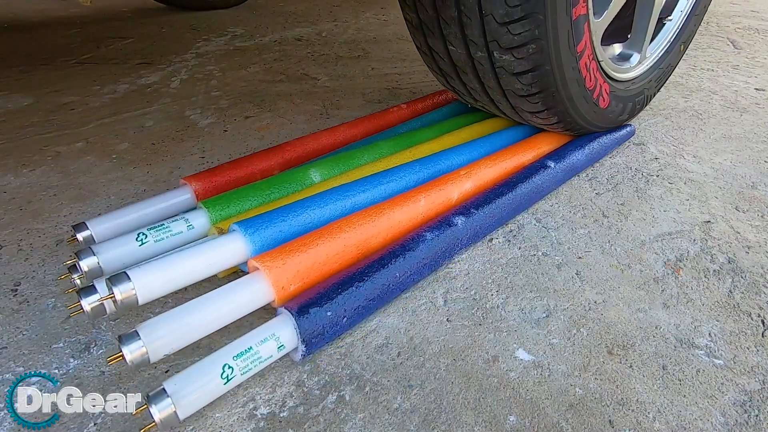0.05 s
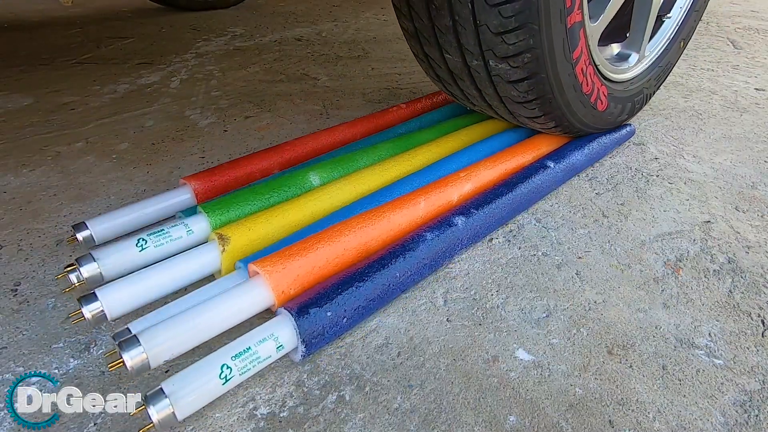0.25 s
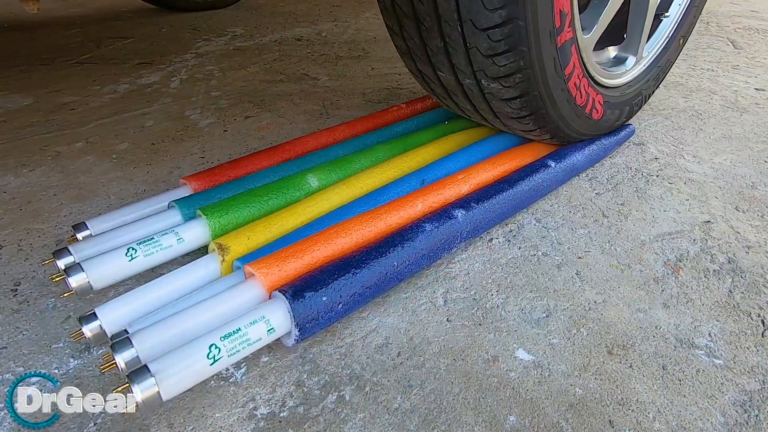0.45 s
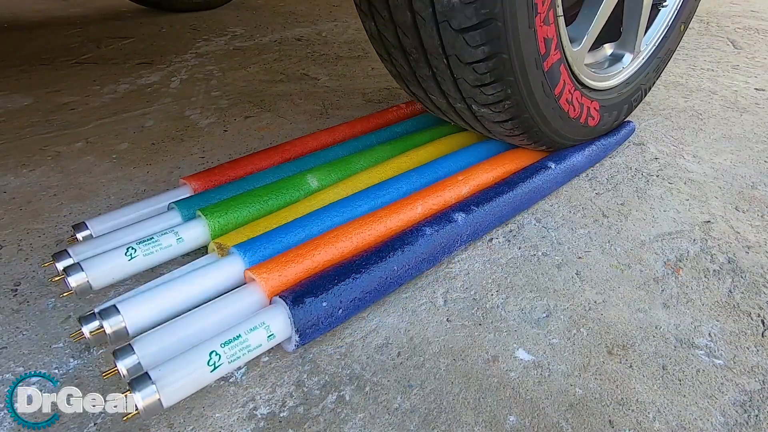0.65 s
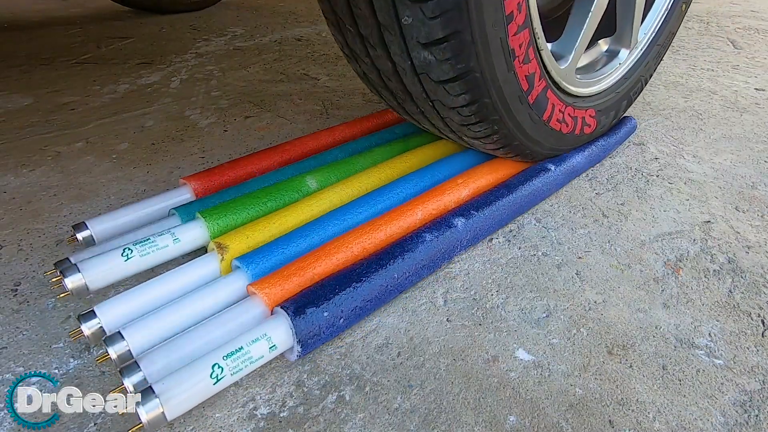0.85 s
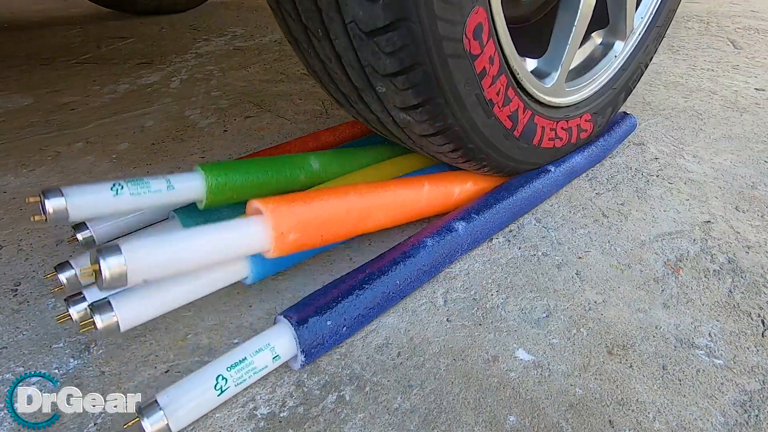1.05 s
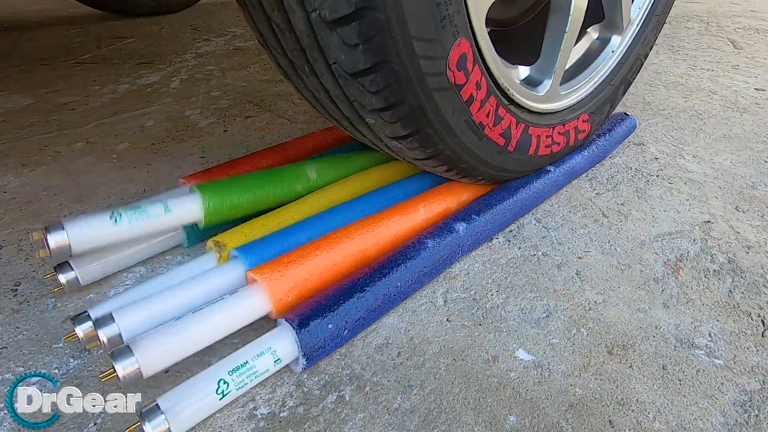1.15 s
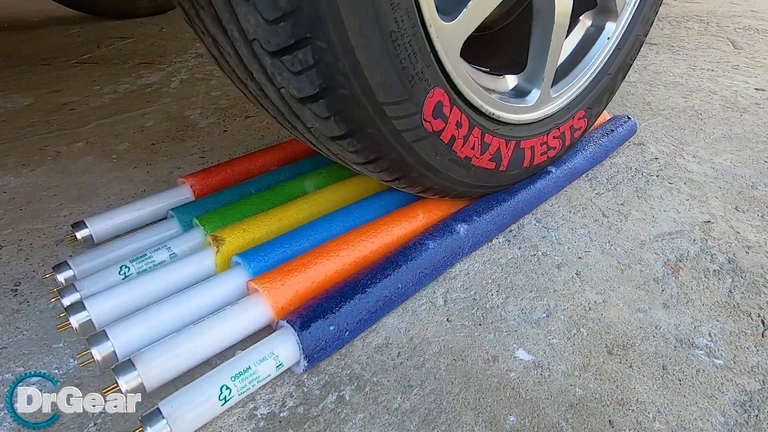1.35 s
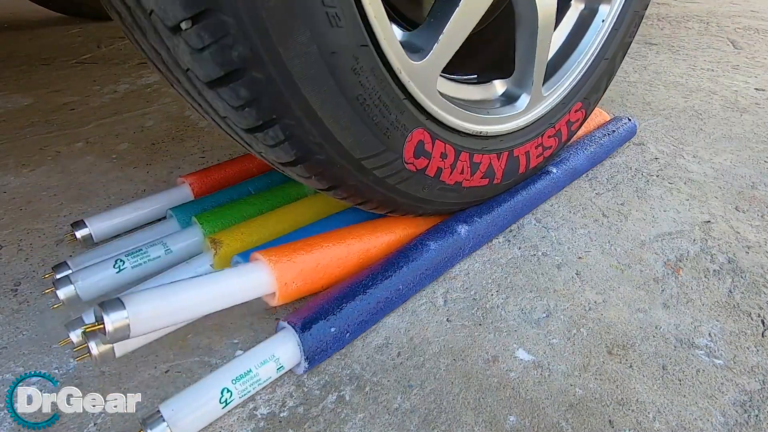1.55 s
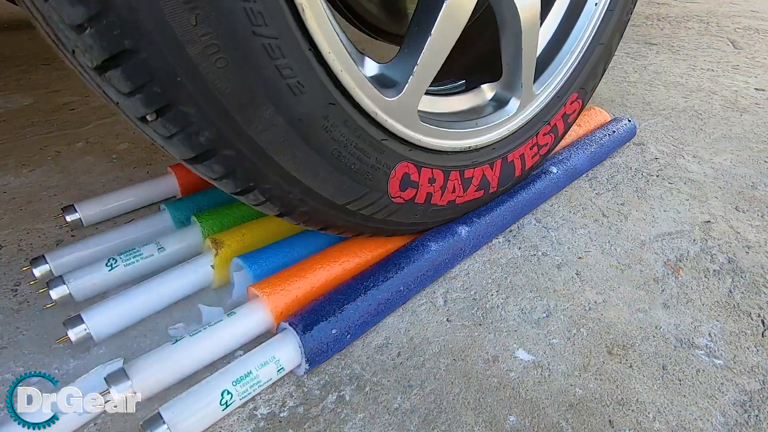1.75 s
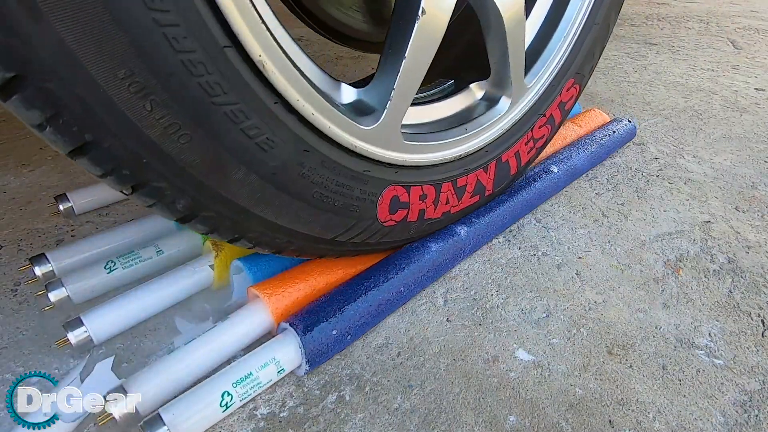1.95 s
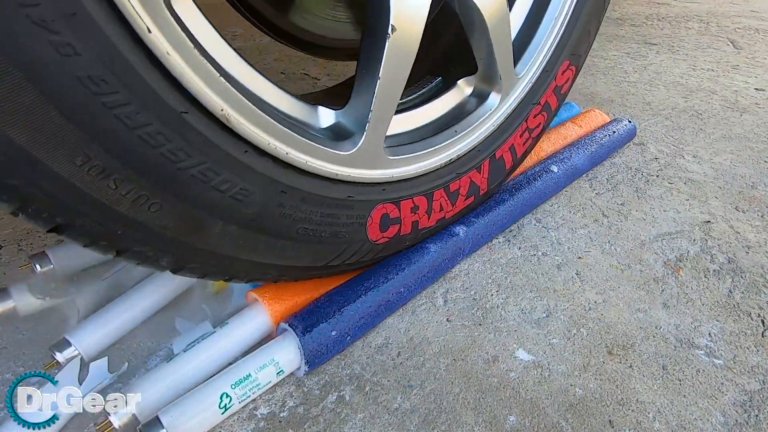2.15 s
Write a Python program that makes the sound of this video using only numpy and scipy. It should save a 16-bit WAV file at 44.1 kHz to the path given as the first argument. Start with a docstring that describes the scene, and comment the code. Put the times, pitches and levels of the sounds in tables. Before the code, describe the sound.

Glass tubes crushed by a car tyre on concrete: sharp hollow pops early, a brief near-quiet, then dense bright cracking and crunching, one more huge pop, and sparse cracks. Close microphone, nearly mono, overloading on the pops.

```python
"""On concrete, close to the microphone, a car tyre creeps over glass tubes in foam sleeves.
Whole tubes implode: each pop is a falling sweep, a hollow ring, a noisy rush and a swing of pressure.
Cracks are decaying bursts of clicks with ringing shards, dull knocks and a low push.
Random grains of glass crunch under the tread, and behind them an engine hums in sines over rumbling noise,
with a flickering airy hiss. The loudest pops overload the input."""
import sys
import numpy as np
from scipy import signal
from scipy.fft import rfft, irfft, next_fast_len
from scipy.io import wavfile

SR = 44100
rng = np.random.default_rng(int(sys.argv[2]) if len(sys.argv) > 2 else 0)


def bounce(signal):
    """Save signal as a 16-bit WAV file at the path given by the first command-line argument."""
    frames = np.transpose(np.atleast_2d(signal))
    limited = np.clip(frames, -1, 1)
    pcm = np.round(limited * 32767).astype(np.int16)
    wavfile.write(sys.argv[1], SR, pcm)


def convert_level_to_amplitude(level_db):
    """Map a level in decibels to its linear amplitude factor."""
    exponent = np.asarray(level_db, float) / 20
    return 10 ** exponent


N = 97020   # length [samples]


def rms_one(x):
    """Scale to rms 1."""
    return x / np.sqrt(np.mean(x ** 2) + 1e-20)


def in_time(rows):
    """Draw the columns of a timed table as curves with a value at every sample."""
    s, *columns = np.transpose(rows)
    return [np.interp(np.arange(N) / SR, s, c) for c in columns]


def filtered(x, order, hz, kind):
    """Butterworth filter: keep what lies below, above or between the given frequencies."""
    return signal.sosfilt(signal.butter(order, hz, kind, fs=SR, output="sos"), x)


def noise_around(hiss, hz):
    """Noise from an octave below to an octave above a pitch, at rms 1."""
    return rms_one(filtered(hiss, 2, [hz * .5, hz * 2], "band"))


def colour(x, points):
    """Minimum-phase filter with the given spectrum, so nothing sounds early."""
    size = next_fast_len(N + 4096)
    hz, db = np.transpose(points)
    f = np.arange(size // 2 + 1) * SR / size + 1   # 1 Hz up, so that the logarithm exists
    spectrum_db = np.maximum(np.interp(np.log(f), np.log(hz), db), -70)
    cepstrum = irfft(spectrum_db * np.log(10) / 20, size)
    # folding the second half onto the first gives minimum phase
    cepstrum[1:size // 2] *= 2
    cepstrum[size // 2 + 1:] = 0
    return irfft(rfft(x, size) * np.exp(rfft(cepstrum)), size)[:N]


def drift(rate):
    """Chance wandering of rms 1: noise smoothed above a rate in Hz."""
    r = np.exp(-2 * np.pi * rate / SR)
    noise = rng.standard_normal(N + SR)
    return rms_one(signal.lfilter([1], [1, -2 * r, r * r], noise)[SR:])


def dying(s, db, t60):
    """Envelope that jumps at each time and falls by 60 dB in t60 seconds."""
    clicks = np.zeros(N)
    np.add.at(clicks, (np.asarray(s) * SR).astype(int), convert_level_to_amplitude(db))
    return signal.lfilter([1], [1, -convert_level_to_amplitude(-60 / (t60 * SR))], clicks + 1e-18)


def ring(clicks, hz, t60):
    """Resonance: a unit click starts a dying sine of height 1."""
    r, w = convert_level_to_amplitude(-60 / (t60 * SR)), 2 * np.pi * hz / SR
    return signal.lfilter([0, np.sin(w)], [1, -2 * r * np.cos(w), r * r], clicks + 1e-18)


def spikes(spread_db, rate=SR):
    """Random fracture clicks of uneven size, on average rate per second; rms 1."""
    sizes = convert_level_to_amplitude(spread_db * np.minimum(rng.exponential(1, N), 5)) * rng.choice([-1, 1], N)
    return rms_one(sizes * (rng.random(N) < rate / SR))


def burst(s, db, t60, points, tail_t60=0.09, tail_db=-20):
    """Fracture clicks under a quick decay and a weaker, longer tail, then coloured."""
    grit = spikes(2)
    shape = dying(s, db, t60) + convert_level_to_amplitude(tail_db) * dying(s, db, tail_t60)
    return colour(grit * shape, points) / np.std(colour(grit, points))


# when a tube implodes: time [s]
POP_TIMES = [.2123, .3755, .3946, .4168, 1.6906]
# each implosion, one row per time: (sweep level [dB], settled pitch [Hz], sweep t60 [s], hollow level [dB],
# crack level [dB], suction level [dB], suction t60 [s], pressure swing [Hz])
IMPLOSIONS = [(6.5, 607, 0.023, 2, -7.5, 4, 0.11, 1.4), (-1.5, 740, 0.024, -1.5, -8, -0.5, 0.26, 6.2),
              (4, 610, 0.021, -2.5, -11.5, 6, 0.05, 44), (-3, 560, 0.045, -3, -14, -22, 0.033, 4.1),
              (6.5, 880, 0.017, 4, -16, 17, 0.036, 21)]
# hollow ring of the sleeved tubes: (pitch [Hz], relative level [dB], t60 [s])
HOLLOW_MODES = [(229, -21, 0.73), (396, 5.5, 0.027), (595, 14.5, 0.019), (790, -9.5, 0.075),
                (1150, -11, 0.031)]
# colour of broken glass, in the pops and under the tread: (frequency [Hz], relative level per Hz [dB])
GRIT_COLOUR = [(900, -33.5), (1600, -5.5), (2500, 2), (5100, 2), (6800, -3.5), (10600, -2), (14900, -22),
               (16500, -35)]


def pops():
    """A falling sweep, the hollow ring of the tubes and an inrush of air that pulls the pressure down."""
    SWEEP_HZ, FALL_S, SWEEP_RISE_S = 1500, .0008, .0012
    RUSH_DB, RUSH_T60_S, SUCTION_RISE_S = -9.5, 0.079, .005
    out, t = np.zeros(N), np.arange(SR // 2) / SR
    noise = rng.standard_normal((len(IMPLOSIONS), len(t)))
    waver = convert_level_to_amplitude(3 * drift(20))
    for at, row, hiss in zip(POP_TIMES, IMPLOSIONS, noise):
        db, hz, t60, hollow_db, _, suction_db, suction_t60, swing_hz = row
        pitch = hz + SWEEP_HZ * np.exp(-t / FALL_S)
        sweep = np.sin(2 * np.pi * np.cumsum(pitch) / SR) * convert_level_to_amplitude(db - 60 * t / t60)
        sweep = sweep * (1 - np.exp(-t / SWEEP_RISE_S))

        hit = hiss * convert_level_to_amplitude(-60 * t / 0.018)
        hollow = sum(convert_level_to_amplitude(mode_db) * ring(hit, f, d) for f, mode_db, d in HOLLOW_MODES)
        hollow = hollow / np.abs(hollow).max()
        # noisy collapse of the walls
        rush = convert_level_to_amplitude(RUSH_DB - 60 * t / RUSH_T60_S) * noise_around(hiss, hz)

        suction = convert_level_to_amplitude(suction_db - 60 * t / suction_t60) * np.cos(2 * np.pi * swing_hz * t)
        suction = suction * (1 - np.exp(-(t / SUCTION_RISE_S) ** 2))

        i = int(at * SR)
        body = convert_level_to_amplitude(hollow_db) * waver[i:i + len(t)] * (hollow + rush)
        out[i:i + len(t)] += (sweep + body - suction)[:N - i]
    crack_db = np.transpose(IMPLOSIONS)[4]
    return out + burst(POP_TIMES, crack_db, .022, GRIT_COLOUR, tail_t60=0.22, tail_db=-25.5)


# glass cracks, levels relative within each column:
# (time [s], crack level [dB], top treble level [dB], knock level [dB], knock pitch [Hz])
GLASS_CRACKS = [(0.7443, -13.5, -16.5, -27, 858), (0.789, -12, -9, -28.5, 846),
                (0.8928, -13, -16, -24, 535), (0.9283, -23.5, -35, -44, 800), (0.9793, -5, -9, -17.5, 765),
                (0.9876, -13, -13, -38, 1660), (1.026, -27, -42, -28, 840),
                (1.0591, -4.5, -10.5, -18, 1074), (1.069, -18, -21.5, -19, 807),
                (1.0966, -24.5, -34.5, -17.5, 750), (1.1079, -6.5, -5.5, -11.5, 1164),
                (1.1161, -23, -19, -9, 1350), (1.1242, -4.5, -4, -21, 486), (1.1347, -5.5, -13, -12.5, 690),
                (1.2188, -9.5, -10, -29.5, 1150), (1.2306, -21, -15.5, -14.5, 894),
                (1.257, -16, -25, -10.5, 1445), (1.2664, -15.5, -26, -10.5, 940),
                (1.275, -13, -14, -16.5, 1010), (1.2862, -21, -14, -11.5, 990),
                (1.2947, -51, -12.5, -21, 830), (1.308, -6.5, -14, -39, 1730),
                (1.331, -23, -21.5, -9.5, 1340), (1.3345, -7, -8.5, -11.5, 1450),
                (1.3926, -19, -48, -13.5, 607), (1.4477, -12, -21, -18.5, 1320),
                (1.4642, -33.5, -22.5, -11.5, 580), (1.4682, -15, -24, -26.5, 1400),
                (1.4874, -10, -14, -5, 1030), (1.5263, -17.5, -14.5, -47, 1480),
                (1.5275, -15.5, -41, -18, 1620), (1.5397, -7, -6.5, -5, 1070), (1.5759, -23, -9, -23, 900),
                (1.5922, -7, -4.5, -15, 660), (1.5997, -32, -14, -26.5, 630), (1.6097, -16, -9, -20.5, 890),
                (1.6264, -11.5, -11, -15, 757), (1.6443, -33.5, -18, -12, 920), (1.659, -12, -16, -16, 870),
                (1.6675, -25, -20.5, -17.5, 920), (1.824, -23.5, -25.5, -40, 770),
                (1.8451, -27, -26.5, -22, 886), (1.8588, -19, -19, -16, 1220), (1.9709, -17, -26, -21, 920),
                (1.98, -24.5, -25, -12.5, 1096), (2.0746, -12, -21, -16.5, 1490),
                (2.0885, -24, -42, -24, 950), (2.0962, -17.5, -20.5, -13, 740),
                (2.1469, -14.5, -18.5, -9, 1020), (2.1924, -15.5, -16.5, -13.5, 760)]
# main part of a crack: (frequency [Hz], relative level per Hz [dB])
MAIN_COLOUR = [(880, -22.5), (1500, 10), (2060, 8), (2400, 7), (5690, 13), (6550, 0), (7500, 5), (9750, 3),
               (16500, -120)]
# top treble of a crack: (frequency [Hz], relative level per Hz [dB])
TREBLE_COLOUR = [(3820, -25.5), (6500, 11.5), (10400, 14.5), (15100, -3), (16000, -9.5), (16500, -28)]


def cracks():
    """Breaking glass: a bright burst of clicks and a second one in the top treble."""
    s, crack_db, top_db, *_ = np.transpose(GLASS_CRACKS)
    main = burst(s, crack_db, .022, MAIN_COLOUR)
    top = burst(s, top_db, .018, TREBLE_COLOUR)
    return convert_level_to_amplitude(-5.5) * main + convert_level_to_amplitude(-7) * top


# ringing of middle-sized shards: (pitch [Hz], relative level [dB])
SHARD_MODES = [(2471, -12), (2955, -12.5), (3914, -18.5), (4447, -12.5), (5706, -14), (7106, -22)]


def rattling_shards():
    """Each crack shakes a large, middle or small shard, whose resonances ring to random clicks."""
    LEVEL_DB, SPREAD_DB, RATTLE_T60_S, RING_T60_S = -25, 4, .05, .04
    PITCH_STEP = .07   # share by which large shards sound lower and small ones higher
    s, crack_db, *_ = np.transpose(GLASS_CRACKS)
    chance = rng.standard_normal((len(s), len(SHARD_MODES)))   # strength of each mode in each crack
    size = rng.integers(-1, 2, len(s))
    out = np.zeros(N)
    for (hz, db), own in zip(SHARD_MODES, chance.T):
        grit = spikes(2)
        level_db = crack_db + LEVEL_DB + db + SPREAD_DB * own
        for k in (-1, 0, 1):
            shake = dying(s[size == k], level_db[size == k], RATTLE_T60_S)
            out += ring(grit * shake, hz * (1 + PITCH_STEP * k), RING_T60_S)
    return out


# a single shard sings out: (time [s], level [dB], pitch [Hz], t60 [s])
SINGING_SHARDS = [(0.893, -21.5, 4447, 0.081), (1.5781, -6, 4850, .03)]


def pings():
    """Single shards sing out: one click sets one resonance ringing."""
    out = np.zeros(N)
    for at, db, hz, t60 in SINGING_SHARDS:
        click = dying([at], 0, 1 / SR)   # gone after one sample
        out += convert_level_to_amplitude(db) * ring(click, hz, t60)
    return out


# dull knocks of the sleeved tubes, no bright fracture: (time [s], relative level [dB], pitch [Hz])
DULL_KNOCKS = [(0.346, -38, 734), (0.501, -39, 730), (0.593, -44, 660), (.693, -42, 1230),
               (0.708, -36, 710), (0.764, -30.5, 940), (0.949, -32.5, 626), (1.1459, -4.5, 1036),
               (1.1904, -28.5, 750), (1.3802, -9, 1090), (1.4988, -11.5, 970), (1.6995, 2, 1077),
               (1.7075, -6.5, 815), (1.763, -20, 810), (1.776, -32, 910), (1.81, -40, 1010),
               (1.885, -32.5, 750), (2.0089, -27.5, 930)]


def knocks():
    """Hollow knocks, with and without a crack: a dying sine, noise around it and a low push of pressure."""
    CYCLES = 14.84   # cycles in which a knock falls by 60 dB
    LEVEL_DB, NOISE_DB, PUSH_DB = 3.5, -4.5, -7.5
    blows = np.vstack([np.array(GLASS_CRACKS)[:, [0, 3, 4]], DULL_KNOCKS])
    t, out = np.arange(SR // 10) / SR, np.zeros(N)
    for (at, db, hz), hiss in zip(blows, rng.standard_normal((len(blows), len(t)))):
        i = int(at * SR)
        tone = np.sin(2 * np.pi * hz * t) + convert_level_to_amplitude(NOISE_DB) * noise_around(hiss, hz)
        knock = tone * convert_level_to_amplitude(LEVEL_DB + db - 60 * t * hz / CYCLES)
        out[i:i + len(t)] += knock[:N - i]
    # doubled decibels: the push grows with the square of the knock
    push = filtered(dying(blows[:, 0], 2 * blows[:, 1], 0.03), 2, 100, "low")
    return filtered(out, 2, 180, "high") - convert_level_to_amplitude(PUSH_DB) * push


# grinding under the tread: (time [s], bright level [dB], dull level [dB])
GRINDING = [(.72, -73, -66), (.76, -35, -37), (.87, -52, -63), (.93, -38.5, -44.5), (1.13, -33.5, -35),
            (1.2, -34.5, -34.5), (1.3, -30.5, -28), (1.46, -33, -31.5), (1.64, -35, -28), (1.7, -44, -34.5),
            (1.86, -41, -36), (1.93, -53.5, -52.5), (2.0, -44, -39), (2.2, -40.5, -40.5)]


def crunch():
    """Clumped grains of glass grinding under the tread: bright grit, tinkling shards and a dull part."""
    GRAINS_PER_S, GRAIN_DB, CLUMP_DB, TINKLE_DB = 2500, 3.5, 4, -8
    bright_db, dull_db = in_time(GRINDING)
    grains = spikes(GRAIN_DB, GRAINS_PER_S) * convert_level_to_amplitude(CLUMP_DB * drift(49))
    grit = rms_one(colour(grains, GRIT_COLOUR))
    tinkle = sum(convert_level_to_amplitude(db + CLUMP_DB * drift(10)) * ring(grains, hz, .04) for hz, db in SHARD_MODES)
    dull = rms_one(filtered(grains, 3, [550, 1600], "band"))
    return convert_level_to_amplitude(bright_db) * (grit + convert_level_to_amplitude(TINKLE_DB) * rms_one(tinkle)) + convert_level_to_amplitude(dull_db) * dull


# level at which the hum and rumble are heard, much lower after the first pops:
# (time [s], relative level [dB])
HEARD_LEVEL = [(0, -35.5), (.15, -38), (.2, -42.5), (.33, -57), (.5, -59.5), (.65, -61.5), (.85, -59.5),
               (1.5, -56), (2.2, -59.5)]
# tones of the hum: (multiple of the firing rate, relative level [dB])
ENGINE_ORDERS = [(1, -4), (2, -6), (4, 10), (7, 1)]
# colour of the rumble: (frequency [Hz], relative level per Hz [dB])
RUMBLE_COLOUR = [(15, -32), (40, 11), (110, -9.5), (230, 5), (350, -11.5), (650, -5), (1500, -19),
                 (3000, -57)]


def engine():
    """Idling engine: wavering multiples of the firing rate over a rumble of coloured noise."""
    FIRING_HZ, WAVER_DB, SPEED_WAVER, RUMBLE_DB = 37, 2, .012, 5   # firing rate once settled, on average
    START_SHARE, SETTLE_S = .09, .12   # the engine starts a little fast and settles
    (heard_db,) = in_time(HEARD_LEVEL)
    speed = 1 + START_SHARE * np.exp(-np.arange(N) / SR / SETTLE_S) + SPEED_WAVER * drift(1.8)
    t = np.cumsum(speed) / SR   # engine time runs unevenly
    hum = np.zeros(N)
    for k, db in ENGINE_ORDERS:
        tone = np.sin(2 * np.pi * (k * FIRING_HZ * t + rng.random()))
        hum += convert_level_to_amplitude(db + WAVER_DB * drift(5.8)) * tone
    rumble = rms_one(colour(rng.standard_normal(N), RUMBLE_COLOUR))
    return convert_level_to_amplitude(heard_db) * (hum + convert_level_to_amplitude(RUMBLE_DB) * rumble)


# level at which the airy hiss is heard, before it flickers: (time [s], level [dB])
HISS_LEVEL = [(0, -44.5), (.2, -52), (.33, -52.5), (.5, -78.5)]
# colour of the hiss: (frequency [Hz], relative level per Hz [dB])
AIR_COLOUR = [(880, -21.5), (1500, -1), (2120, -1), (2830, -6), (9100, -5.5), (16000, -21)]


def airy_hiss():
    """Coloured noise that flickers quickly in level and sinks early on."""
    (level_db,) = in_time(HISS_LEVEL)
    return convert_level_to_amplitude(level_db + 2.0 * drift(80)) * rms_one(colour(rng.standard_normal(N), AIR_COLOUR))


# difference between the channels: (frequency [Hz], side relative to middle [dB])
SIDE_COLOUR = [(100, -45), (1500, -37), (4000, -29), (8000, -24), (13000, -14)]


def scene():
    """Near-mono mix with a faint difference between the channels, strongest in the treble."""
    mid = pops() + cracks() + rattling_shards() + pings() + knocks() + crunch() + engine() + airy_hiss()
    side = colour(np.roll(mid, 70), SIDE_COLOUR)   # 70 samples late
    return np.array([mid + side, mid - side])


def roll_off(x):
    """The treble ends steeply here."""
    return signal.sosfilt(signal.butter(12, 16800, fs=SR, output="sos"), x)


def record(dry):
    """The input overloads, then a gentle high-pass lets the pressure swing back."""
    clipped = np.tanh(dry ** 3 / 3 + dry)   # bends towards a ceiling of 1
    mix = filtered(clipped, 2, 1.95, "high")
    return roll_off(mix)


dry = scene()
out = record(dry)
bounce(out)
```